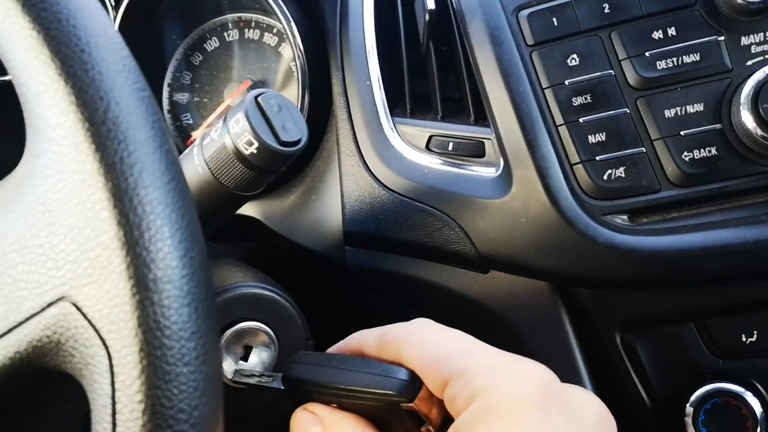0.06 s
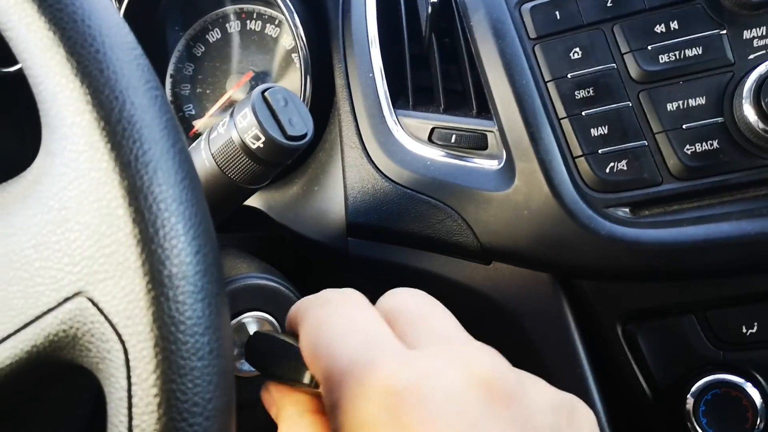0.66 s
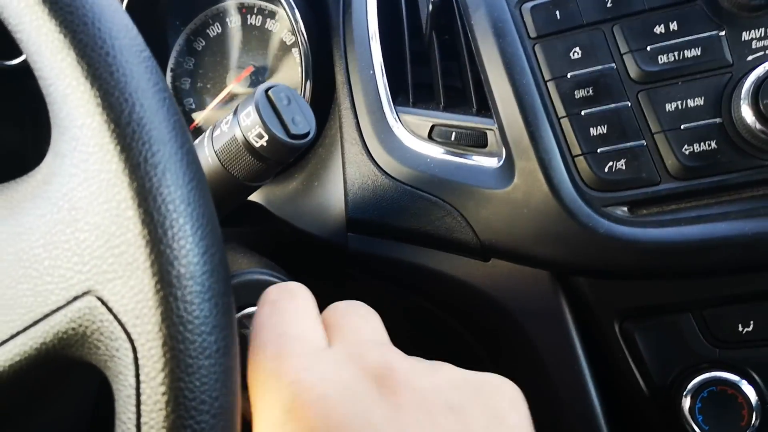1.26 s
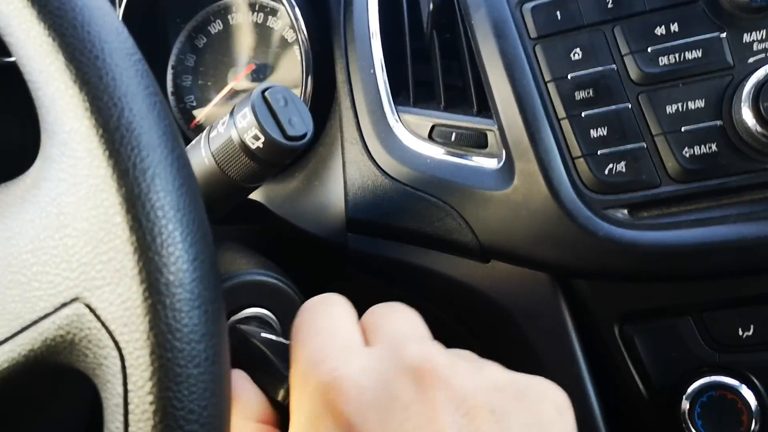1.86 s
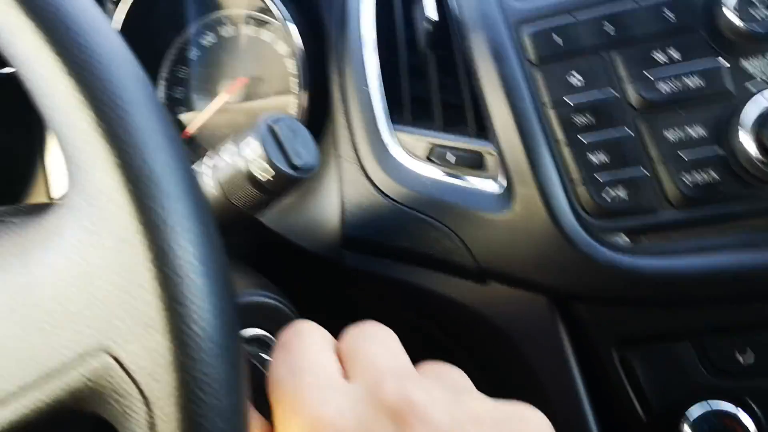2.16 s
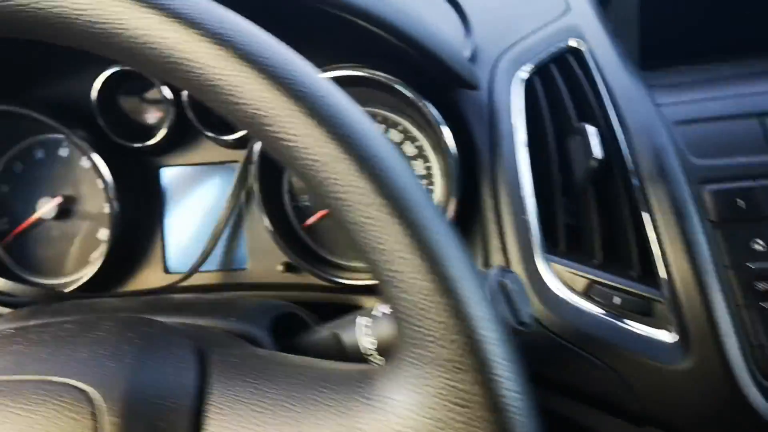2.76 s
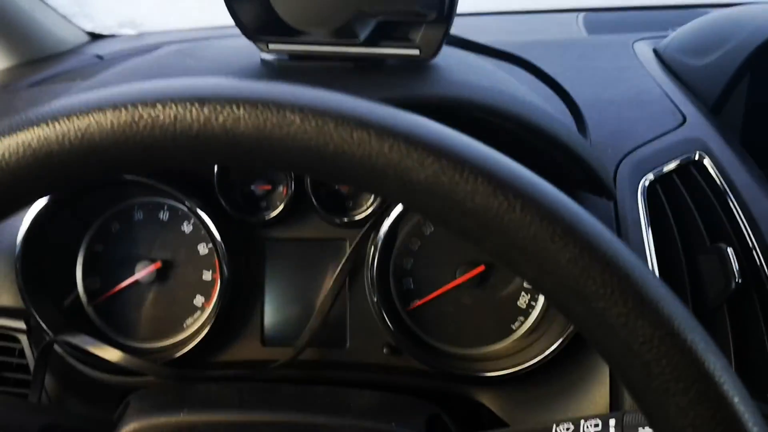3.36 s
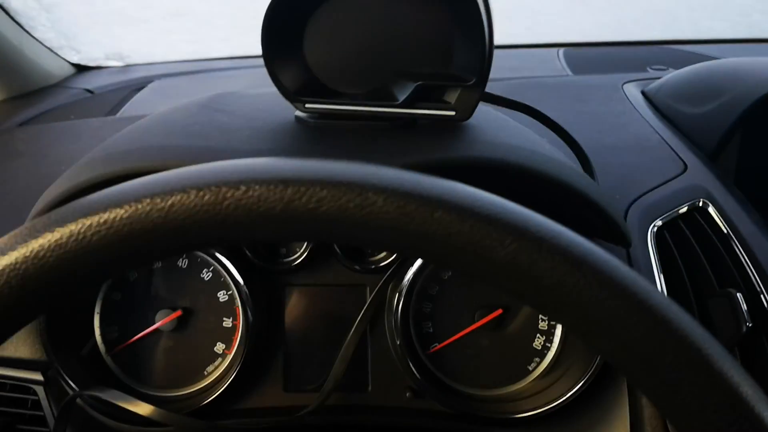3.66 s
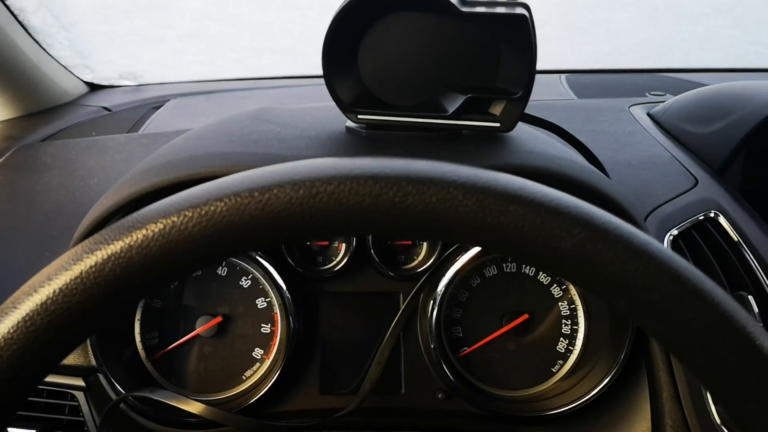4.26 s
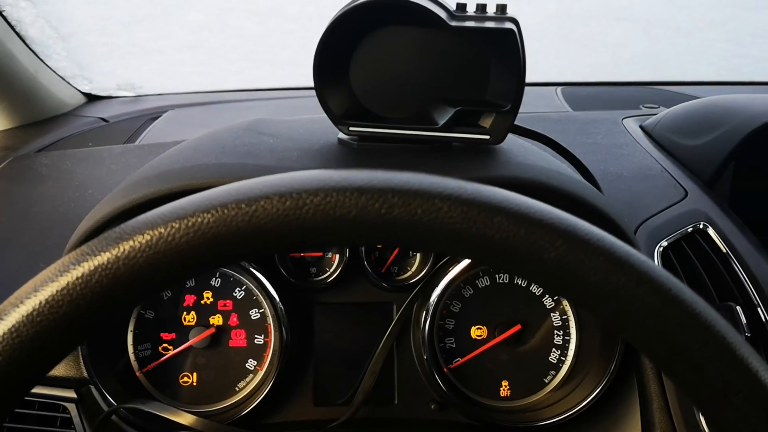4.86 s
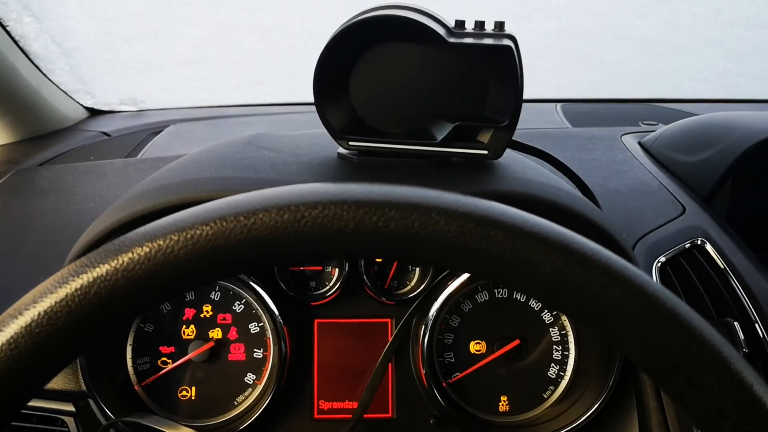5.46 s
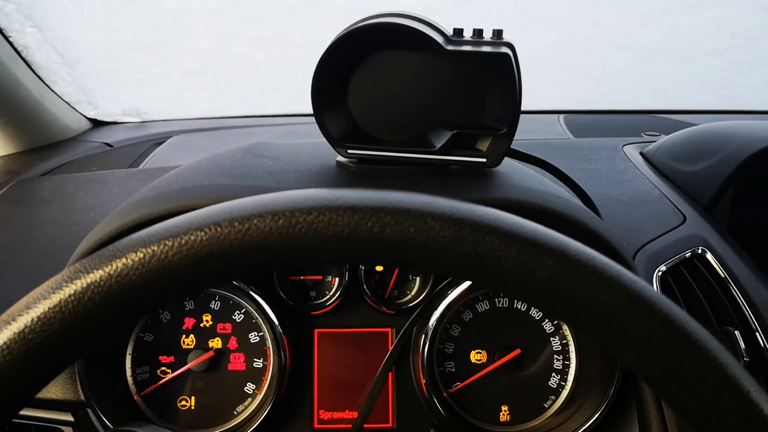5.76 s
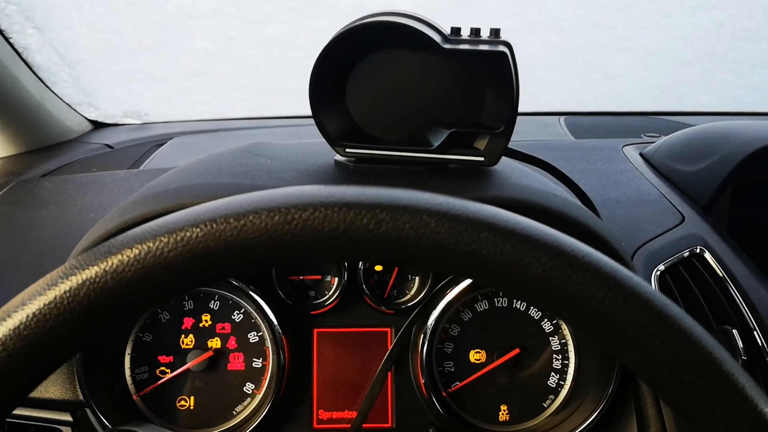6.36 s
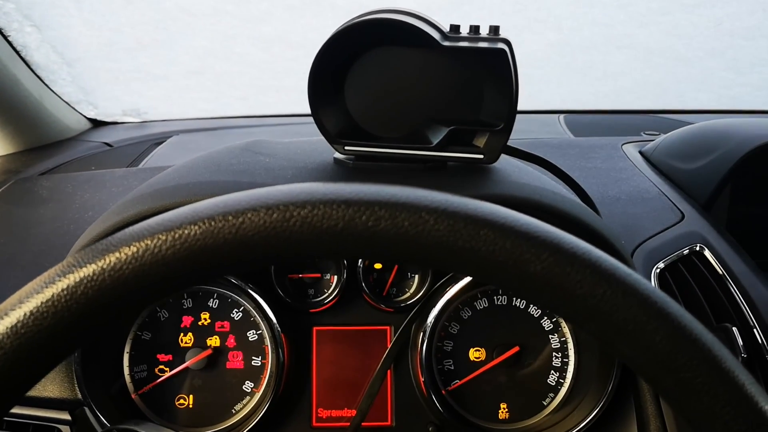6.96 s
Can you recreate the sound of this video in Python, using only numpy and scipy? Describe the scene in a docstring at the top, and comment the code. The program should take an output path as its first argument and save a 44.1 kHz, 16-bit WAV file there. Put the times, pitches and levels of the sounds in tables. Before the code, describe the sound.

Metallic clicks and rattles of a key in a car's ignition lock, then a last click, a short low buzz and quiet humming.

```python
"""A sharp metal tap: inside a parked car a key meets the ignition lock, scrapes in past the wafers,
seats and clicks through its detents, each contact ringing the barrel and booming the steering column.
A sleeve brushes by. Just after the last loud click the electrics come on with a low shudder,
and the fuel pump hums for about two seconds. Underneath, fingers bump a hand-held camera
over the faint hiss and rumble of the closed cabin."""
import sys
import numpy as np
from scipy import signal
from scipy.fft import rfft, irfft, next_fast_len
from scipy.io import wavfile
from scipy.ndimage import map_coordinates

SR = 44100
rng = np.random.default_rng(int(sys.argv[2]) if len(sys.argv) > 2 else 0)


def wrap_up_sound(samples):
    """Save the sound to the file named by the first command line argument, as 16-bit audio."""
    columns = np.atleast_2d(samples).T
    # keep every value between -1 and 1, then stretch to whole-number steps
    tamed = np.clip(columns, -1, 1)
    steps = np.round(tamed * 32767).astype(np.int16)
    wavfile.write(sys.argv[1], SR, steps)


N = 318471


def amp(db):
    """Decibels to gain."""
    return 10 ** (np.asarray(db) / 20)


def unit(x):
    """x at rms 1."""
    return x / np.sqrt(np.mean(x ** 2) + 1e-20)


def curve_at(points, hz):
    """Read (frequency, value) points on a log frequency axis."""
    freqs, values = np.transpose(points)
    return np.interp(np.log(hz + 1), np.log(freqs + 1), values)


def bell(hz, centre, width):
    """A resonance peak of height 1, half as high at the edges of its width."""
    return 1 / (1 + (2 * (hz - centre) / width) ** 2)


def wobble(rate):
    """A smooth random curve with rate knots a second."""
    knots = rng.standard_normal(int(N * rate / SR) + 4)
    return map_coordinates(knots, [np.arange(N) * rate / SR])


def filtered(x, response):
    """Equalise x with a gain given as a function of frequency."""
    size = next_fast_len(N + SR // 2)
    return irfft(rfft(x, size) * response(np.fft.rfftfreq(size, 1 / SR)), size)[..., :N]


def stereo_noise(correlation, size):
    """White noise, wide at correlation 0 and mono at 1."""
    mid, side = rng.standard_normal((2, size))
    angle = np.arccos(np.clip(correlation, -1, 1)) / 2
    return np.cos(angle) * mid + np.sin(angle) * np.array([side, -side])


def shaped_noise(spectrum, correlation, drive=1):
    """Coloured stereo noise of rms 1; drive modulates it ahead of the EQ."""
    noise = stereo_noise(correlation, N) * drive
    return unit(filtered(noise, lambda hz: amp(curve_at(spectrum, hz))))


def minimum_phase(gain):
    """The minimum-phase impulse response of a gain curve."""
    cepstrum = irfft(np.log(np.maximum(gain, 1e-6)))
    half = len(cepstrum) // 2
    cepstrum[1:half] *= 2
    cepstrum[half + 1:] = 0
    return irfft(np.exp(rfft(cepstrum)))


def add(track, start, sound):
    """Mix a sound into a track from start seconds on."""
    part = track[..., round(start * SR):][..., :sound.shape[-1]]
    part += sound[..., :part.shape[-1]]


def swell(start, hold, fade):
    """Gain that holds at 1 and is 20 dB down fade seconds before and after."""
    t = np.arange(N) / SR
    outside = np.maximum(0, np.maximum(start - t, t - start - hold))
    return amp(-20 * outside / fade)


def strokes(rows):
    """One envelope from (start [s], hold [s], fade [s], level [dB]) swells, summed in power."""
    return np.sqrt(sum((amp(db) * swell(start, hold, fade)) ** 2 for start, hold, fade, db in rows))


def throb(hz, half_length):
    """A low tone that swells and fades, centred 0.1 s after its start."""
    t = np.arange(-SR // 10, SR // 10) / SR
    return np.sin(2 * np.pi * hz * t) * np.exp(-(t / half_length) ** 2)


# Tone of the deep rumble, the dull rub and the airy hiss: (frequency [Hz], level [dB])
RUMBLE_EQ = [(8, -7.5), (20, -0.5), (32, -2), (55, -8.5), (80, -16), (130, -34), (300, -75.5), (600, -120)]
RUB_EQ = [(30, -15.5), (70, 3), (110, 3.5), (160, -3.5), (250, -14.5), (400, -32.5), (800, -83.5),
          (2000, -100)]
HISS_EQ = [(150, -9), (280, -2), (450, -10), (750, -12), (1300, -9.5), (1950, -8), (2600, -11.5),
           (7500, -21.5), (15800, -28.5)]
# The hand shifts on the camera: (start [s], hold [s], fade [s], rumble [dB], rub [dB])
HAND_MOVES = [(1.335, 0.11, 0.52, -47.5, -52.5), (2.674, 0.17, 0.52, -45, -56),
              (3.255, 0.13, .4, -51, -64.5), (3.606, 0.17, 0.54, -43.5, -54.5),
              (5.407, .1, 0.15, -49.5, -57.5), (6.91, 0.14, .2, -50, -79)]

def background(rest_rumble_db=-51.5, rest_rub_db=-69, hiss_db=-73):
    """The bed: each move of the hand makes the camera rumble and rub, over a steady hiss."""
    rumble_gain = np.hypot(amp(rest_rumble_db), strokes([(*when, db) for *when, db, _ in HAND_MOVES]))
    rub_gain = np.hypot(amp(rest_rub_db), strokes([(*when, db) for *when, _, db in HAND_MOVES]))
    rumble = rumble_gain * shaped_noise(RUMBLE_EQ, correlation=1.0)
    rub = rub_gain * shaped_noise(RUB_EQ, correlation=0.95)
    return rumble + rub + amp(hiss_db) * shaped_noise(HISS_EQ, correlation=0.017)


# Fingers knock the camera body, and the last row adds the low thud of the key contact at 7.1 s: (time [s],
# pitch [Hz], relative level [dB])
FINGER_BUMPS = [(0.303, 154, -49), (1.714, 176, -45.5), (2.026, 150, -51), (2.171, 189, -47),
                (2.692, 124, -40), (2.771, 198, -40.5), (2.941, 135, -43), (3.416, 160, -43),
                (3.593, 151, -40.5), (3.619, 155, -39.5), (3.674, 170, -43), (4.150, 147, -38),
                (5.2048, 173, -34), (5.407, 130.6, -35), (5.423, 160, -43.5), (5.464, 181, -34.5),
                (5.655, 178, -43), (5.792, 161, -40), (6.693, 152, -36.5), (7.104, 220, -52)]

def finger_bumps(half_cycles=0.46, edge_db=-20, edge_ratio=2.03, fidget_hz=163, fidget_db=-46.5):
    """Each bump is one dull swing with a firmer edge; six light fidgets fall in mid-scene."""
    out = np.zeros(N)
    fidgets = [(time + 0.03 * rng.normal(), fidget_hz, fidget_db + 2 * rng.normal())
               for time in np.linspace(3.24, 3.85, 6)]
    for time, hz, db in FINGER_BUMPS + fidgets:
        edge_hz = hz * edge_ratio
        thud = throb(hz, half_cycles / hz)
        edge = amp(edge_db) * throb(edge_hz, half_cycles / edge_hz)
        add(out, time - 0.1, amp(db + 1.5) * (thud + edge))
    return out


# Tone of the cloth: (frequency [Hz], level [dB])
CLOTH_EQ = [(150, -1.5), (300, 2.5), (500, -7.5), (700, -10), (1300, -9.5), (2000, -5.5), (3800, -13),
            (5600, -11), (6500, -13.5), (7900, -11), (10500, -21.5), (15500, -27)]
# Passes of the sleeve: (start [s], hold [s], fade [s], level [dB])
SLEEVE_BRUSHES = [(0, 0.078, 0.37, -71), (0.55, 1.67, 0.36, -77), (1.84, 0.025, 0.24, -66),
                  (2.08, 0.09, 0.05, -68), (2.39, 1.66, 0.32, -65), (3.62, 0.19, 0.42, -64),
                  (4.62, 0.14, 0.12, -69)]

def sleeve(grain_db=1, flicker_db=0.88):
    """Cloth brushes by in soft, slightly uneven swishes."""
    cloth = shaped_noise(CLOTH_EQ, correlation=0.017, drive=amp(grain_db * wobble(900)))
    return strokes(SLEEVE_BRUSHES) * amp(flicker_db * wobble(17)) * cloth


def fuel_pump(running_hz=98.6, level_db=-55, overtone_db=-30, flow_db=-12, waver_db=1.45):
    """An almost pure, wavering hum over a faint flow; it is lower while the pump spins up or down."""
    running = swell(start=4.77, hold=1.8, fade=0.07)
    hz = running_hz * (1 - 0.08 * (1 - running)) * (1 + 0.01 * wobble(16))
    phase = 2 * np.pi * np.cumsum(hz) / SR
    tone = np.sqrt(2) * (np.sin(phase) + amp(overtone_db) * np.sin(2 * phase))
    hum = amp(waver_db * wobble(12)) * tone
    flow = amp(flow_db) * shaped_noise(RUB_EQ, correlation=0.77)
    return amp(level_db) * running * (hum + flow)


POWER_ON_S = 4.570
# Tone of the shaken trim: (frequency [Hz], level [dB])
TRIM_EQ = [(100, -8), (220, 12.5), (340, -1), (480, -14.5), (700, -36), (1500, -55)]

def trim_buzz(level_db=-38, decay_db_per_s=183, attack_s=0.004):
    """The switch-on shakes a brief buzz out of the dashboard trim."""
    t = np.maximum(0, np.arange(N) / SR - POWER_ON_S)
    envelope = amp(level_db - decay_db_per_s * t) * (1 - np.exp(-t / attack_s))
    return envelope * shaped_noise(TRIM_EQ, correlation=0.14)


def switch_on(start_hz=261, end_hz=91.8, sag_s=0.026, flutter_hz=28.2, flutter_depth=0.44,
              attack_s=0.018, hold_s=0.158, release_s=0.016, hum_db=-27.5, decay_db_per_s=40):
    """The electrics wake with a short, rough, pulsing hum that sags in pitch and sways the dashboard."""
    t = np.maximum(0, np.arange(N) / SR - POWER_ON_S)
    hz = (end_hz + (start_hz - end_hz) * np.exp(-t / sag_s)) * (1 + 0.1 * wobble(70))
    tone = np.sin(2 * np.pi * np.cumsum(hz * (t > 0)) / SR)
    envelope = (1 - np.exp(-t / attack_s)) * np.exp(-np.maximum(0, t - hold_s) / release_s)
    flutter = 1 - flutter_depth * np.cos(2 * np.pi * flutter_hz * t)
    roughness_db = 2.0 * wobble(130)
    shudder = amp(hum_db - decay_db_per_s * t + roughness_db) * envelope * flutter * tone
    sway = amp(-31) * throb(hz=33, half_length=0.05)
    add(shudder, POWER_ON_S + 0.098 - 0.1, sway)  # centred 98 ms into the hum
    return shudder


# Low modes of the dashboard: (pitch [Hz], relative level [dB], half length [s])
DASH_MODES = [(43, 0.5, 0.027), (108, -10, 0.023), (148, -8, 0.014)]
# The key is pushed home: (time [s], level [dB])
KEY_SEATS = [(1.382, -32.5), (1.503, -39.5)]

def dashboard_thumps():
    """The dashboard gives as the key seats and swings for a few cycles."""
    out = np.zeros(N)
    thump = sum(amp(db) * throb(hz, half_length) for hz, db, half_length in DASH_MODES)
    for time, db in KEY_SEATS:
        add(out, time - 0.1, amp(db) * thump)
    return out


# Hollow modes of the steering column: (pitch [Hz], relative level [dB], t60 [s])
COLUMN_MODES = [(241.5, -5, 0.21), (194.7, -7, 0.092), (305.3, -12.5, 0.06), (401, -9, 0.049)]

def column_boom(contacts, power_on_db=-15, attack_s=0.0081, phase_spread=0.45, detune=0.045):
    """Contacts and switch-on boom the plastic column, a little differently each time and on each side."""
    out = np.zeros((2, N))
    t = np.arange(SR // 2) / SR
    onset = 1 - np.exp(-t / attack_s)
    hits = [(time, boom_db) for time, *_, boom_db, _ in contacts] + [(POWER_ON_S, power_on_db)]
    for time, boom_db in hits:
        for hz, db, t60 in COLUMN_MODES:
            tuned_hz = hz * (1 + detune * rng.normal())
            phase = 2 * np.pi * tuned_hz * t + phase_spread * rng.standard_normal((2, 1))
            add(out, time, amp(boom_db + db - 60 * t / t60) * np.sin(phase) * onset)
    return amp(-14.5) * out


# Squeal bands of the barrel in its housing: (centre [Hz], width [Hz], relative level [dB])
SQUEAK_BANDS = [(1340, 66, 3.5), (1470, 91, -4), (2025, 390, -4)]
# Turns of the barrel: (start [s], hold [s], fade [s], level [dB])
BARREL_TURNS = [(2.11, .04, 0.1, -66), (2.27, .02, .05, -70), (2.54, 0.018, .05, -74.5)]

def barrel_squeak():
    """Turning under load, the barrel rubs its housing into a faint, narrow squeal."""
    def bands(hz):
        return sum(amp(db) * bell(hz, centre, width) for centre, width, db in SQUEAK_BANDS)
    return strokes(BARREL_TURNS) * unit(filtered(stereo_noise(0.17, N), bands))


# Tone of the scraping blade: (frequency [Hz], level [dB])
BLADE_EQ = [(120, -18), (240, 12), (380, -7.5), (620, -12), (950, -5), (1400, -7.5), (2050, -1), (2900, -7),
            (4500, -10.5), (8000, -10), (10500, -17.5), (15500, -23.5)]
# Pushes of the blade into the lock: (start [s], hold [s], fade [s], level [dB])
BLADE_PUSHES = [(0.745, 0.038, 0.094, -53.5), (1.015, 0.022, 0.08, -60), (1.23, 0.12, 0.15, -59.5),
                (1.375, 0.16, 0.047, -51.5)]

def blade_scrape(grain_db=2.0):
    """The key's blade scrapes over the wafers in fine grains."""
    grains = amp(grain_db * wobble(1600))
    return strokes(BLADE_PUSHES) * shaped_noise(BLADE_EQ, correlation=0.05, drive=grains)


# Metallic tone shared by all contacts: (frequency [Hz], level [dB])
METAL_EQ = [(150, -2.5), (600, -5), (1250, 0.5), (2800, 1), (7300, -1.64), (12500, -15.5), (16000, -25.5)]
# Ring of the barrel and its shroud: (centre [Hz], width [Hz], boost [dB])
BARREL_RESONANCES = [(1020, 184, 2), (1240, 76, 0), (1670, 160, 3.5), (2076, 136, 7), (3087, 200, 1.5),
                     (3820, 280, 5.5), (4330, 330, -5), (5410, 150.3, 4.5), (6070, 250, 0.5),
                     (7150, 354, -1.5), (7590, 110, 9.5), (8900, 470, 6.5)]
# Key and lock make contact: (time [s], build-up [s], t60 [s], relative level [dB], low-end weight [dB],
# tink pitch [Hz], tink boost [dB], relative column boom [dB], left over right [dB])
KEY_CONTACTS = [(0.0844, .0013, 0.073, -21.5, -2, 2980, 10.5, -40, 0.5),
                (0.5677, 0.00084, 0.038, -13, -15, 4620, 9.5, -29.5, 2.5),
                (1.2046, 0.0027, 0.062, -18, 13, 5540, 5.5, -17.5, -1.5),
                (1.301, 0.0039, 0.062, -13.5, 4.5, 1390, 11, -23.5, 0),
                (1.3355, 0.0039, 0.066, -1.5, 5, 5800, 3.5, -14.5, 2.5),
                (1.4786, 0.00035, 0.0058, -5.5, -10, 6960, 20, -42, 3.5),
                (1.481, 0.00082, 0.0288, -8, -5.5, 6850, 12, -19, 3.5),
                (1.948, .0013, .015, -43, -3, 4200, 16, -61, 0),
                (1.970, 0.0018, .014, -36, 10, 4970, 19, -46, 1),
                (1.988, 0.0015, 0.011, -47.5, 17.5, 4700, 5, -64, 0),
                (2.41, 0.0098, 0.067, -7.5, -2.5, 5000, 13, -26.5, -0.5),
                (2.491, 0.0044, 0.031, -32.5, 0, 5200, 14, -57, -3),
                (2.603, 0.0085, 0.0434, -14, 3.5, 3430, 17, -33, 3),
                (2.614, 0.0029, 0.042, -9.5, 2, 7120, 8, -20, 2),
                (4.505, 0.0083, 0.067, -9, 3, 1700, 3, -31, 3),
                (7.1, 0.0035, 0.017, -50, 22, 1030, 15, -50, 4)]

def lock_clicks(lead_in_db=-26, tink_q=9, size=8192):
    """Each contact is a tight rattle of metal that swells, dies away and rings the barrel."""
    out = np.zeros((2, N))
    t, hz = np.arange(size) / SR, np.fft.rfftfreq(size, 1 / SR)
    centre, width, boost_db = np.transpose(BARREL_RESONANCES)[:, :, None]
    low_shelf = curve_at([(1300, 1), (3200, 0)], hz)
    for time, build, t60, db, weight_db, tink_hz, tink_db, _, pan_db in KEY_CONTACTS:
        force = amp(np.where(t < build, lead_in_db * (1 - t / build), -60 * (t - build) / t60))
        rattle = stereo_noise(correlation=0.025, size=size) * force
        rattle /= np.linalg.norm(rattle, axis=1, keepdims=True)
        colour_db = db + curve_at(METAL_EQ, hz) + weight_db * low_shelf
        colour_db += tink_db * bell(hz, tink_hz, tink_hz / tink_q)  # the small struck part tinks
        # every contact, heard from either side, favours different resonances
        peaks_db = boost_db + rng.standard_normal((2, len(BARREL_RESONANCES), 1))
        rings_db = np.sum(peaks_db * bell(hz, centre, width), axis=1)
        body = np.array([minimum_phase(amp(colour_db + side_db)) for side_db in rings_db])
        pan = amp([[pan_db / 2], [-pan_db / 2]])
        add(out, time, signal.fftconvolve(rattle, body, axes=1) * pan)
    return amp(-2.5) * out


# Stereo tilt of the lock at the camera: (frequency [Hz], left over right [dB])
STEREO_TILT = [(300, -22.5), (600, 5), (1050, -4), (1600, -9.5), (2300, -1.5), (4500, 1), (7500, -1),
               (10000, 3), (13000, -15.5)]

def camera_shading(x):
    """The camera's body shades its two microphones differently from the lock."""
    return filtered(x, lambda hz: amp(np.outer([0.5, -0.5], curve_at(STEREO_TILT, hz))))


# Decay of the cabin: (frequency [Hz], t60 [s])
CABIN_DECAY = [(200, 0.21), (1500, 0.11), (6000, 0.059), (14000, 0.021)]

def cabin_reverb(x):
    """The upholstered cabin answers with a very short tail whose treble dies first."""
    hz, t, noise = signal.stft(rng.standard_normal((2, SR // 3)), SR, nperseg=256)
    decay = amp(-60 * t / curve_at(CABIN_DECAY, hz)[:, None])
    tail = signal.istft(noise * decay, SR, nperseg=256)[1]
    tail /= np.linalg.norm(tail[0])
    tail = np.pad(tail, ((0, 0), (SR // 300, 0)))  # 3.3 ms pre-delay
    return signal.fftconvolve(x, tail, axes=1)[:, :N]


def scene():
    """The lock up front in its cabin, over the low sounds of car and hand."""
    clicks = camera_shading(lock_clicks())
    lock = clicks + amp(-8.5) * cabin_reverb(clicks) + column_boom(KEY_CONTACTS)
    friction = blade_scrape() + sleeve() + barrel_squeak()
    thumps = finger_bumps() + dashboard_thumps()
    electrics = switch_on() + trim_buzz() + fuel_pump()
    return lock + friction + thumps + electrics + background()


def record(dry):
    """A brick-wall low-pass takes off the air above 15.7 kHz."""
    return filtered(dry, lambda hz: hz < 15700)


dry = scene()
out = record(dry)
wrap_up_sound(out)
```